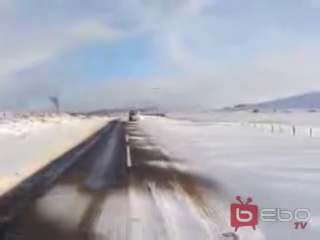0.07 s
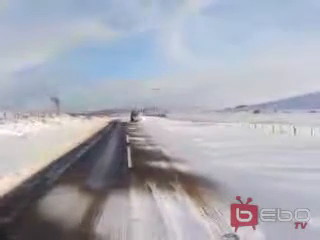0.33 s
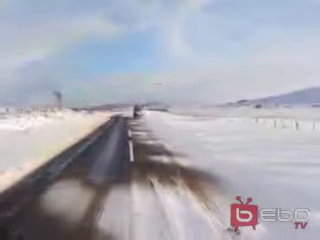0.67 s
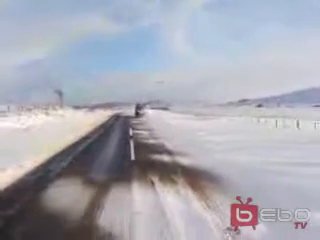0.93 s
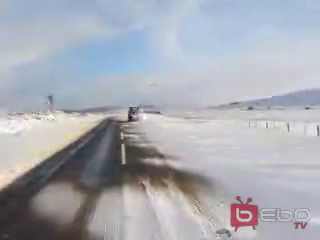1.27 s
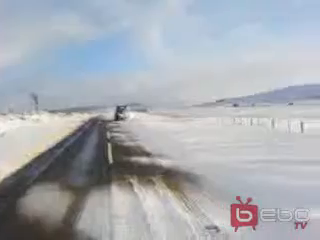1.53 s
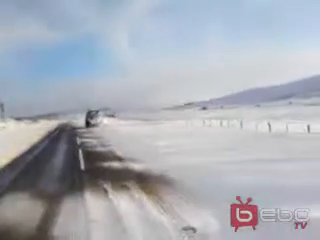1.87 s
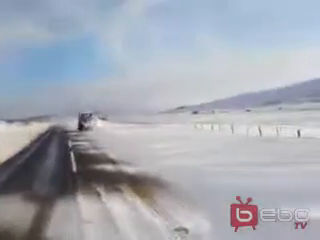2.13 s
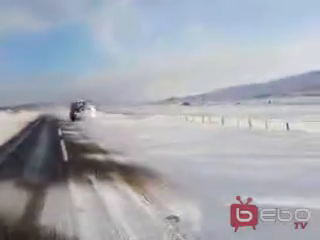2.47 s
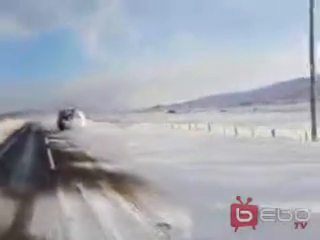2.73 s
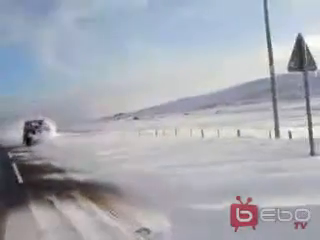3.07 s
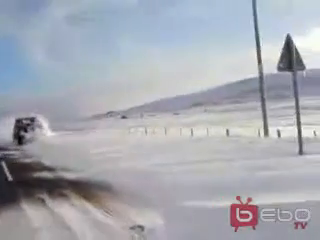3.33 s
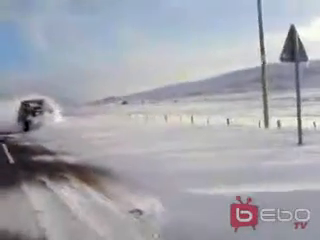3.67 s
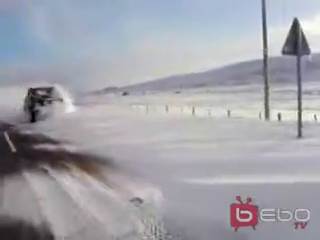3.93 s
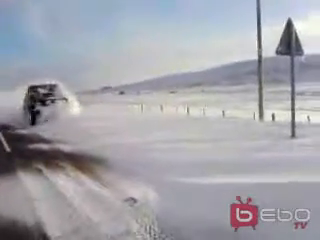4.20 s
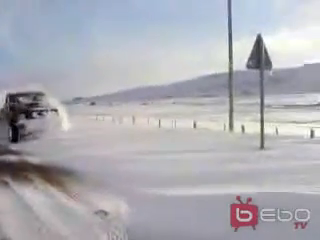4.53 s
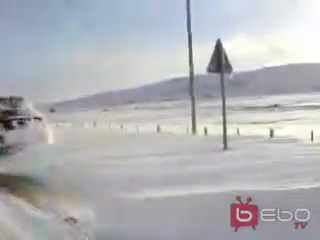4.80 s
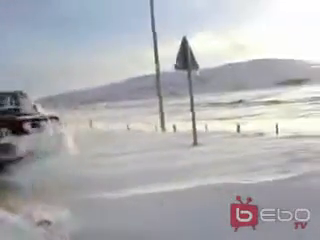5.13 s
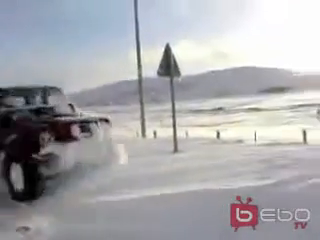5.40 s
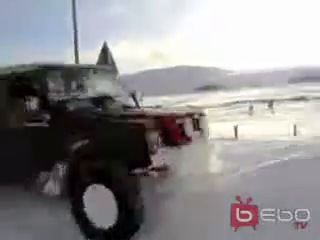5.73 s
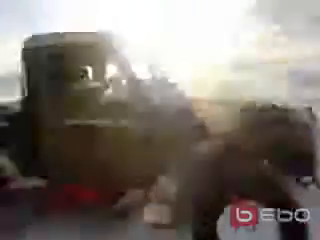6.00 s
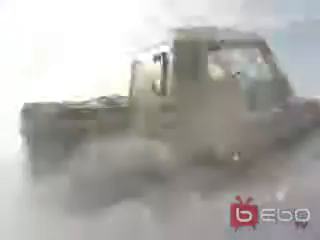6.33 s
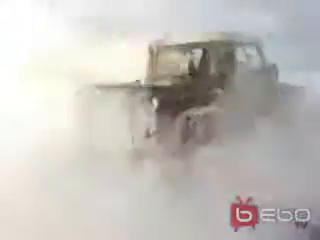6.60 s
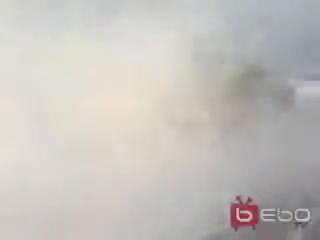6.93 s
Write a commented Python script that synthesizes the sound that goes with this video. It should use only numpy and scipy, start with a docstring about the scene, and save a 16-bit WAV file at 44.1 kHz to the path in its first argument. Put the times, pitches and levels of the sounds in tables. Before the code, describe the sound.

Gusty wind rumbles and rasps on a small microphone outdoors, hardest at first, with brief crackles of overload. An off-road truck approaches along a snowy road, its engine clattering and gears whining, while the tyres squeak and throw up hissing snow. It passes very close, then the pitch drops and the exhaust drones as it pulls away. The wind keeps buffeting throughout, and the sound is narrow and dull.

```python
"""Gusty wind rumbles and rasps on a small camera's microphone, its eddies overloading the input.
An off-road truck then comes down a snowy country road and passes close by: the firings clatter, the
gears whine, and the tyres squeak by stick-slip friction and throw up snow. The pitch drops as it goes
by (Doppler effect, and the driver eases off) and the exhaust drones from behind.
The camera passes a narrow band; only brief crunches and ticks reach above it."""
import sys
import numpy as np
from scipy import signal
from scipy.fft import rfft, irfft, next_fast_len
from scipy.io import wavfile
from scipy.ndimage import uniform_filter1d, map_coordinates

SR = 44100
rng = np.random.default_rng(int(sys.argv[2]) if len(sys.argv) > 2 else 0)


def transcribe(u):
    """Save the signal u as a 16-bit wav file named by the first command-line argument.

    u: samples, shape (n,) or (channels, n), limited to [-1, 1]; the rate is SR.
    q: integer samples, one column per channel.
    """
    v = np.clip(np.atleast_2d(u).T, -1, 1)
    q = np.round(v * 32767).astype(np.int16)
    wavfile.write(sys.argv[1], SR, q)


N = 316197
TIME = np.arange(N) / SR


def undb(db):
    """Decibels to amplitude ratio."""
    return 10 ** (np.asarray(db) / 20)


def unit(x):
    """Normalisation to rms 1."""
    return x / np.sqrt(np.mean(x ** 2))


def noise():
    """Gaussian white noise."""
    return rng.standard_normal(N)


def walk(rate):
    """Smooth random modulation of rms 1, changing about rate times a second."""
    steps = rng.standard_normal(4096)
    return unit(map_coordinates(steps, [TIME * rate], order=3, mode="wrap"))


def curves(table):
    """Linear interpolation of each column over the times in the first."""
    times, *columns = np.transpose(table)
    return [np.interp(TIME, times, column) for column in columns]


def step(middle_s, takes_s):
    """Sigmoid transition from 0 to 1."""
    return (1 + np.tanh((TIME - middle_s) / takes_s)) / 2


def swells(rows):
    """Sum of Gaussian envelopes, one for each row."""
    return sum(undb(db) * np.exp(-((TIME - s) / half_s) ** 2) for s, db, half_s in rows)


def colour(x, points):
    """Spectral shaping by (frequency_hz, gain_db) points, normalised to rms 1."""
    size = next_fast_len(N)
    hz, db = np.transpose(points)
    bins = np.maximum(np.arange(size // 2 + 1) * SR / size, 1)
    gain = undb(np.interp(np.log(bins), np.log(hz), db))
    return unit(irfft(rfft(x, size) * gain, size)[:N])


def partials(cycles, table, waver_db, blur_rad, rate=9):
    """Additive synthesis: multiples of one rate, each wavering in level and phase; rms 1."""
    return unit(sum(undb(db + waver_db * walk(rate))
                    * np.sin(2 * np.pi * multiple * cycles + blur_rad * walk(rate))
                    for multiple, db in table))


def steep_lowpass(x, hz):
    """Elliptic low-pass with a sharp cutoff."""
    return signal.sosfilt(signal.ellip(8, .1, 70, hz, fs=SR, output="sos"), x)


def saturate(x, ceiling, order):
    """Soft clipping; a higher order gives a harder knee."""
    return x / (1 + abs(x / ceiling) ** order) ** (1 / order)


def buffets(rows, rise_s=0.003):
    """Pressure envelope of passing eddies: each rises quickly and holds briefly."""
    out = np.zeros(N + SR)
    age = np.arange(SR // 5) / SR
    for start_s, db, length_s in rows:
        start = int(start_s * SR)
        shape = (1 - np.exp(-age / rise_s)) * np.exp(-(age / max(length_s, rise_s)) ** 4)
        out[start:start + len(age)] += undb(db) * shape
    return out[:N]


def small_eddies(per_s=12, mean_s=0.026, scatter_db=3):
    """Fine turbulence: eddies of random time, strength and length."""
    chance = rng.random((int(per_s * N / SR), 3))
    return buffets([(when * N / SR, scatter_db * (2 * size - 1), mean_s * (.5 + length))
                    for when, size, length in chance])


def wind(flutter_db=1.43, eddy_db=-3, gust_boost=0.033, evenness=0.12, tear_db=-6, tear_growth=0.87):
    """Turbulent pressure rumbles in the microphone port; flow separation at its rim adds a rasp."""
    # running wind: time_s, level_db
    breeze = [(0.0, -13), (0.25, -12.5), (0.42, -14), (0.55, -10.5), (0.7, -11.5), (0.92, -6.5), (1.08, -7),
              (1.14, -14.5), (1.24, -14), (1.44, -14), (1.72, -16), (1.86, -18), (2.0, -14.5), (2.33, -10),
              (2.56, -18), (2.83, -22.5), (3.03, -22), (3.3, -16), (3.6, -21.5), (3.75, -15.5), (3.91, -18),
              (4.21, -17), (4.69, -16), (4.98, -21), (5.33, -16.5), (5.55, -21), (5.97, -18.5), (6.13, -16),
              (6.25, -12), (6.59, -23.5), (6.83, -24), (7.17, -18)]
    # hardest eddies: start_s, level_db, length_s
    hard_eddies = [(.035, -2, 0.011), (0.078, -2.5, 0.014), (0.136, -8.5, 0.054), (0.189, -8.5, 0.044),
                   (0.338, -7, 0.029), (0.41, -1.5, 0.0091), (.451, -1, 0.011), (0.475, -8, 0.03),
                   (0.519, -6.5, 0.054), (0.589, -2, 0.028), (0.643, -8.5, 0.052), (0.697, -5.5, 0.037),
                   (0.728, -5, 0.017), (0.76, -7.5, 0.024), (0.781, -3.5, 0.036), (0.839, -3.5, .025),
                   (0.864, -5.5, 0.094), (0.956, -5.5, 0.015), (0.997, -7, 0.031), (1.025, -9, 0.076),
                   (1.161, -7.5, 0.046), (1.227, -13, 0.033), (1.309, -10, 0.024), (1.353, -12.5, 0.031),
                   (1.381, -7, 0.036), (1.463, -9.5, 0.034), (1.585, -12.5, 0.024), (1.639, -20, 0.0082),
                   (1.688, -9.5, 0.012), (1.788, -13, 0.013), (1.819, -7, 0.0054), (2.037, -18.5, 0.04),
                   (2.15, -10.5, 0.041), (2.354, -15, 0.011), (2.371, -20, 0.016), (2.481, -12, 0.021),
                   (2.545, -14, 0.012), (2.7, -16, 0.022), (2.776, -18.5, 0.061), (3.275, -14, 0.009),
                   (3.325, -24, 0.0081), (3.415, -9.5, 0.025), (3.44, -10, 0.039), (3.503, -8, 0.046),
                   (3.554, -6.5, 0.028), (3.743, -11.5, 0.035), (3.774, -4, 0.037), (3.817, -7.5, 0.043),
                   (3.875, -20, 0.017), (3.923, -10, 0.011), (3.952, -9, 0.0092), (3.991, -16.5, 0.067),
                   (4.067, -9, 0.032), (4.258, -13.5, 0.035), (4.295, -9, 0.023), (4.335, -5.5, 0.0096),
                   (4.39, -15, 0.044), (4.437, -10.5, 0.034), (4.468, -12, 0.027), (4.644, -16, 0.0074),
                   (4.678, -10.5, 0.0097), (4.725, -12, 0.011), (4.752, -11, 0.096), (4.885, -13, 0.027),
                   (4.914, -10.5, 0.015), (5.075, -9, 0.025), (5.116, -5.5, 0.047), (5.181, -6.5, 0.02),
                   (5.41, -11, 0.024), (5.619, -6.5, 0.013), (5.974, -8, 0.013), (6.022, -11.5, 0.076),
                   (6.087, -6.5, 0.069), (6.168, -12.5, 0.053), (6.272, -20.5, 0.042), (6.34, -17, 0.007),
                   (6.377, -9, 0.014), (7.087, -11.5, 0.016), (7.124, -9.5, 0.052)]
    # rumble spectrum: frequency_hz, gain_db
    rumble_colour = [(15, -62.5), (25, -42.5), (53, -27), (102, -19), (173, -10.5), (211, -4.5),
                     (303, -0.5), (370, -3), (402, -4.5), (598, -13), (682, -15), (1300, -32),
                     (1690, -50.5), (2600, -58)]
    # rise and fall of the rasp's share: time_s, gain_db
    rasp_trend = [(0, 6), (.12, 1.5), (.22, 4), (.5, 2), (.9, 2), (1.1, -1.5), (2.4, -3), (3.5, -4),
                  (5.1, -2.5), (5.62, 1.5), (6.1, 3), (6.4, -2), (7.17, 4.5)]
    # rasp spectrum: frequency_hz, gain_db
    rasp_colour = [(250, -14), (550, 9), (850, 3), (1400, -0.5), (2000, -9.5), (2800, -13.5),
                   (4000, -13.5)]
    level_db, = curves(breeze)
    rasp_db, = curves(rasp_trend)
    running = undb(level_db - 0.5) * unit(undb(flutter_db * walk(70)))
    running *= np.hypot(1, undb(eddy_db) * small_eddies())
    blow = np.hypot(running, buffets(hard_eddies))
    # strong gusts are boosted a little, so they stay loud through the overload
    force = blow * (1 + gust_boost * np.minimum(blow, 1) ** 2)
    rumble = colour(noise(), rumble_colour)
    # within one gust the eddies are of much the same strength
    rumble = unit(rumble / uniform_filter1d(rumble ** 2, size=900) ** (evenness / 2))
    spurts = unit(np.hypot(.7, np.maximum(rumble, 0)))  # the flow tears off at the rumble's crests
    tearing = undb(tear_db + rasp_db) * blow ** (1 + tear_growth) * spurts
    rasp = colour(noise(), rasp_colour) * unit(undb(1.6 * walk(220)))
    return force * rumble + tearing * rasp


def slaps(decay_s=0.0012, gain_db=-2):
    """Damped resonance: each steep-fronted eddy kicks the port, which rings for a cycle or two."""
    # kicks to the port: start_s, level_db, pitch_hz
    kicks = [(0.337, 1, 530), (0.45, -4, 735), (0.52, 1, 670), (0.64, -2, 510), (0.696, -3, 468),
             (0.726, 0, 508), (0.783, -6, 630), (1.23, -5, 460), (1.303, -8, 563), (1.355, -13.5, 614),
             (1.466, 2.5, 460), (1.79, -8, 490), (2.04, -4, 466), (2.349, -11, 677), (2.37, -5, 452),
             (2.485, -10, 440), (3.778, -1, 624), (3.805, 1.5, 487), (3.922, -5, 495), (3.988, -9, 455),
             (4.069, -7.5, 514), (4.262, -7.5, 533), (5.618, -0.5, 583), (7.123, -5, 470)]
    out = np.zeros(N + SR)
    age = np.arange(SR // 30) / SR
    envelope = age / decay_s * np.exp(1 - age / decay_s)
    for start_s, db, hz in kicks:
        start = int(start_s * SR)
        out[start:start + len(age)] += undb(db + gain_db) * envelope * np.sin(2 * np.pi * hz * age)
    return out[:N]


def crunches(grit_db=5):
    """Overload of the microphone in hard gusts, heard as bursts of gritty high noise."""
    # overloads: middle_s, level_db, half_length_s
    bursts = [(0.043, -61, 0.0059), (0.087, -67, .007), (0.355, -71, 0.0072), (0.416, -67, 0.0057),
              (0.464, -51, 0.0064), (0.6, -56, .003), (0.742, -58, .006), (0.8, -54, 0.013),
              (0.882, -45.5, 0.012), (0.937, -51, .006), (0.968, -51, 0.0027), (1.395, -63, .004),
              (5.14, -61, .005), (6.102, -49.5, 0.012), (6.145, -56, 0.017)]
    # crunch spectrum: frequency_hz, gain_db
    crunch_colour = [(2000, -8), (4000, 2.5), (5000, 3), (7500, -2.5), (9000, -19), (15000, -30)]
    grit = noise() * undb(grit_db * np.minimum(walk(500), 1.5))
    return swells(bursts) * colour(grit, crunch_colour)


def ticks():
    """Impulses have a flat spectrum and are heard as dry ticks."""
    # single-sample impulses: time_s, peak_db
    impulses = [(0.152, -42), (0.464, -38), (0.6, -40), (0.877, -35), (0.888, -34), (0.937, -36),
                (5.972, -26), (6.021, -13), (6.098, -36)]
    out = np.zeros(N)
    for time_s, db in impulses:
        out[int(time_s * SR)] = undb(db)
    return out


def drive_past(speed_m_s=8, pass_s=5.76, closest_m=2.6, truck_m=2.58, plume_s=6.73, plume_db_per_s=13.5):
    """Spreading loss from a long moving source (gain 1 when closest), and its Doppler ratio."""
    along = speed_m_s * (TIME - pass_s)
    distance = np.hypot(along, closest_m)
    spreading = np.hypot(closest_m, truck_m) / np.hypot(distance, truck_m)
    plume = undb(-plume_db_per_s * np.maximum(TIME - plume_s, 0))  # the trailing snow cloud absorbs
    doppler = 1 / (1 + speed_m_s * along / distance / 343)
    return spreading * plume, doppler


def clod():
    """Impact of frozen snow on the bodywork: a rough ring with exponential decay."""
    # impact: start_s, level_db, pitch_hz, decay_s
    impacts = [(6.827, -10, 910, 0.003)]
    out = np.zeros(N)
    for start_s, db, hz, decay_s in impacts:
        resonance = [(hz / 2, -40), (hz * 0.56, -5), (hz, 0), (hz * 1.5, -6), (hz * 2, -35)]
        envelope = (TIME > start_s) * np.exp(-abs(TIME - start_s) / decay_s)
        out += undb(db) * envelope * colour(noise(), resonance)
    return out


def squeaks(half_s=.03, slide_hz_per_s=-900, per_s=24, faint_db=-33, low_hz=2350, high_hz=3450):
    """Stick-slip friction of cold snow under the tread; each squeak sags in pitch as the snow packs."""
    # loudest squeaks: middle_s, level_db, pitch_hz
    loudest = [(3.761, -42.5, 3120), (3.812, -37, 2570), (3.84, -36, 1920), (4.24, -38.5, 2690),
               (4.25, -35, 2550), (4.63, -33.5, 1830), (4.889, -34, 2470), (5.099, -32, 2880),
               (5.29, -29.5, 2700), (5.451, -28.5, 2490), (5.489, -26, 2920), (5.63, -27.5, 1920),
               (5.649, -28, 2480), (5.7, -31, 1180), (5.708, -26, 2640), (5.738, -26, 2566),
               (5.93, -27, 2750), (5.969, -24.5, 3270), (6.449, -32, 1050), (6.46, -28.5, 2444),
               (6.518, -25.5, 2630)]
    near, _ = drive_past()
    events = [(middle_s, undb(db), hz) for middle_s, db, hz in loudest]
    for when, size, pitch in rng.random((int(per_s * N / SR), 3)):  # faint ones in between
        gain = near[int(when * N)] * undb(faint_db + 3 * (2 * size - 1))
        events.append((when * N / SR, gain, low_hz + pitch * (high_hz - low_hz)))
    slip_rad = 1.1 * walk(210)
    grip = unit(undb(3 * walk(200)))
    out = np.zeros(N)
    for middle_s, gain, hz in events:
        span = slice(max(int((middle_s - 3 * half_s) * SR), 0), int((middle_s + 3 * half_s) * SR))
        age = TIME[span] - middle_s
        phase = 2 * np.pi * (hz + slide_hz_per_s * age / 2) * age + slip_rad[span]
        out[span] += gain * np.sqrt(2) * np.exp(-(age / half_s) ** 2) * np.sin(phase)
    return out * grip


def thrown_snow(grit_db=3.5):
    """Granular noise: snow hisses as the tyres plough through each drift."""
    # drifts, as if closest: middle_s, level_db, half_length_s
    drifts = [(3.803, -24.5, 0.33), (4.254, -26.5, 0.07), (5.697, -25, 0.08), (5.968, -24, 0.056),
              (6.22, -25.5, 0.19), (6.543, -20.5, 0.088)]
    # hiss spectrum: frequency_hz, gain_db
    snow_colour = [(800, -20), (1500, -9), (2100, -7), (2600, 3.5), (3100, -1.5), (4000, -14)]
    grit = noise() * undb(grit_db * np.minimum(walk(150), 1.8))
    return swells(drifts) * colour(grit, snow_colour)


def whistle():
    """A frequency glide: one wavering driveline tone sinks as the truck comes and goes."""
    # whistle, as if closest: time_s, pitch_hz, level_db
    glide = [(4.6, 1800, -59), (4.78, 1775, -32), (5.0, 1742, -28), (5.18, 1712, -32), (5.38, 1684, -33.5),
             (5.55, 1665, -52), (6.3, 1595, -54), (6.58, 1568, -35), (6.9, 1530, -36.5), (7.17, 1505, -44)]
    hz, db = curves(glide)
    return undb(db) * partials(np.cumsum(hz) / SR, [(1, 0)], waver_db=2, blur_rad=.35, rate=16)


def gears(firings, roar):
    """Meshing teeth whine under load, and the clatter drives a resonance of the gear housing."""
    # gear whine: firing_multiple, relative_db
    gear_lines = [(8, 6.5), (10.67, -13), (11.7, -7.5)]
    # high driveline whine: firing_multiple, relative_db
    high_lines = [(16.05, -1.5), (18.4, -3), (24, -8)]
    # housing resonance: frequency_hz, gain_db
    housing_colour = [(1300, -34), (1600, -11), (1690, -1.5), (1780, -1), (1950, -13), (2300, -35.5)]
    # levels under load, as if closest: time_s, whine_db, high_whine_db, housing_db
    load = [(0, -37.5, -45.5, -33), (2.76, -40, -44, -39.5), (2.92, -25.5, -33.5, -22.5),
            (3.3, -31, -37, -30), (3.6, -34, -43.5, -38.5), (4.45, -39.5, -46, -44),
            (4.75, -30, -45.5, -34), (5.03, -27, -28, -27), (5.2, -37.5, -35, -34), (5.36, -25, -43, -44.5),
            (5.6, -29, -38, -43), (5.93, -29.5, -46, -45), (6.15, -48.5, -48, -48),
            (7.17, -53.5, -48.5, -46)]
    whine_db, high_whine_db, housing_db = curves(load)
    whine = undb(whine_db) * partials(firings, gear_lines, waver_db=2, blur_rad=.3, rate=14)
    high_whine = undb(high_whine_db) * partials(firings, high_lines, waver_db=3, blur_rad=.8, rate=18)
    return whine + high_whine + undb(housing_db) * colour(roar, housing_colour)


def exhaust(firings, level_db=-20, front_db=-10.5):
    """Periodic gas pulses drone from a tailpipe that radiates mostly backwards."""
    # exhaust lines: firing_multiple, relative_db
    lines = [(1, -30), (1.5, -18.5), (2, -10), (2.5, -16.5), (3, 3), (3.5, -12), (4, -5.5), (5, -14.5),
             (5.5, -10.5), (6, -11.5)]
    behind = step(middle_s=6.0, takes_s=.12)
    drone = partials(firings, lines, waver_db=1.5, blur_rad=0.45)
    return undb(level_db + front_db * (1 - behind)) * drone


def clatter_and_tyres(firings, knock_cycles=.6, knock_db=2, rattle_db=3, spray_db=-6):
    """Impact noise: a knock at each firing, valve rattle and snow grains, over the tyres' roar."""
    strength = undb(4.5 * np.clip(rng.standard_normal(2048), -2, 2))[firings.astype(int)]
    knock = unit(noise() * strength * np.exp(-(firings % 1) / knock_cycles))
    # valves and injectors repeat one rattle every four firings, running a little early and late
    pattern = rng.standard_normal(1700)
    place = (firings + .055 * walk(8)) / 4 % 1
    rattle = unit(map_coordinates(pattern, [place * len(pattern)], order=3, mode="wrap"))
    grains = unit(noise() * (rng.random(N) < 700 / SR))  # about 700 a second
    tyres = noise()
    mix = tyres + undb(knock_db) * knock + undb(rattle_db) * rattle + undb(spray_db) * grains
    return unit(mix) * undb(1.2 * walk(35))


def through_gusts(x, depth_db=2.0, rate=12):
    """Scintillation: turbulent air makes third-octave bands swell and fade independently."""
    size = next_fast_len(N)
    spectrum = rfft(x, size)
    hz = np.arange(len(spectrum)) * SR / size
    thirds = 3 * np.log2(np.clip(hz, 500, 4000) / 500)
    bands = (irfft(spectrum * np.maximum(1 - abs(thirds - k), 0), size)[:N] for k in range(10))
    return unit(sum(band * undb(depth_db * walk(rate)) for band in bands))


def nose_and_flank(roar, front_db=-22, side_db=-16.5):
    """Directivity: the roar has one spectrum from the front and a louder one from alongside."""
    # front spectrum: frequency_hz, gain_db
    front_colour = [(100, -1), (250, -5), (500, -10.5), (900, 6), (1300, 0.5), (1600, 0.5), (1760, -1),
                    (2100, 1.5), (2600, 2.5), (3200, -3), (4000, -19.5)]
    # side spectrum: frequency_hz, gain_db
    side_colour = [(100, -2), (280, 12), (440, -0.5), (580, 5), (900, 6.5), (1300, 0.5), (1600, -1.5),
                   (2050, -3), (2600, -1.5), (3200, -0.5), (4000, -11.5)]
    alongside = step(middle_s=5.68, takes_s=0.39)
    front = undb(front_db) * (1 - alongside) * colour(roar, front_colour)
    side = undb(side_db) * alongside * colour(roar, side_colour)
    return front + side


def truck(speed_jitter=0.001442):
    """A moving source: the Doppler-shifted firing rate paces clatter, gears and exhaust."""
    # engine speed, easing off once past: time_s, firing_hz
    engine_speed = [(0, 101), (2.5, 103.4), (2.95, 102.6), (3.3, 101.8), (4.2, 100.8), (4.9, 102.7),
                    (5.35, 103.4), (5.95, 102.6), (6.3, 97.5), (6.55, 95.7), (6.9, 93), (7.17, 92)]
    near, doppler = drive_past()
    firing_hz, = curves(engine_speed)
    firings = np.cumsum(doppler * firing_hz * (1 + speed_jitter * walk(12))) / SR
    roar = through_gusts(clatter_and_tyres(firings))
    machinery = nose_and_flank(roar) + gears(firings, roar) + exhaust(firings) + whistle()
    return near * (machinery + thrown_snow())


def scene():
    """Superposition, in mono, of the wind at the camera and the truck on the road."""
    return (wind() + slaps() + truck() + squeaks() + clod())[None]


def record(dry, low_hz=65, edge_hz=3450, band_hz=4250, top_hz=15800):
    """Saturation and band limiting in microphone and amplifier; crunches and ticks bypass both."""
    microphone = saturate(dry, ceiling=.77, order=4)
    narrow = signal.sosfilt(signal.butter(10, edge_hz, fs=SR, output="sos"), microphone)
    narrow = signal.sosfilt(signal.butter(1, low_hz, "high", fs=SR, output="sos"), narrow)
    amplifier = steep_lowpass(saturate(narrow, ceiling=.69, order=16), band_hz)
    return steep_lowpass(amplifier + crunches() + ticks(), top_hz)


dry = scene()
out = record(dry)
transcribe(out)
```